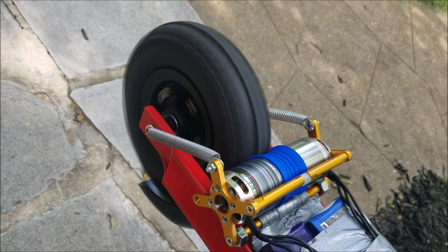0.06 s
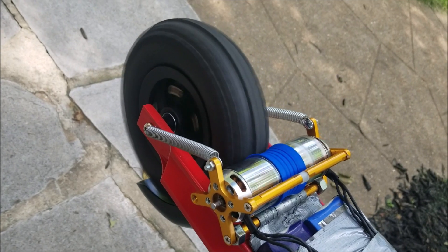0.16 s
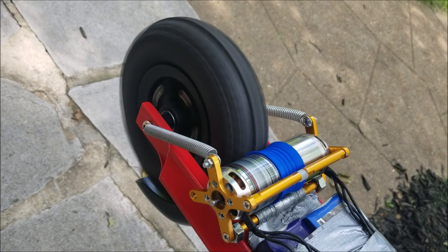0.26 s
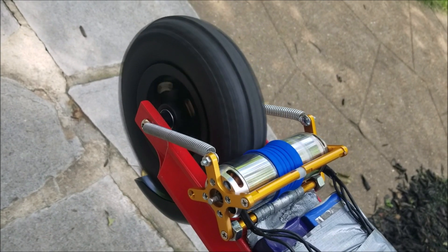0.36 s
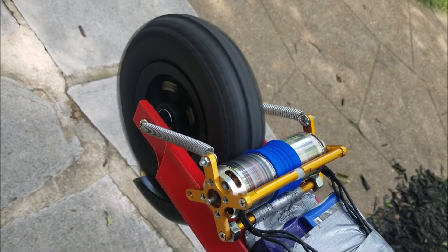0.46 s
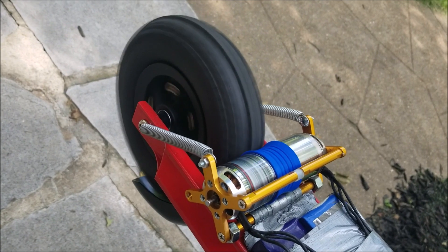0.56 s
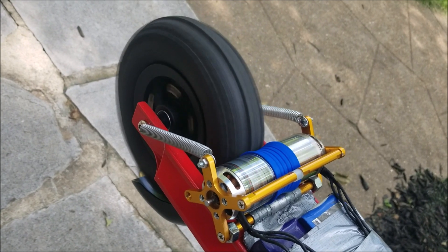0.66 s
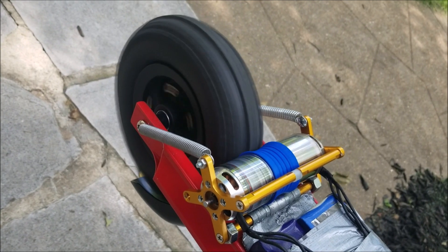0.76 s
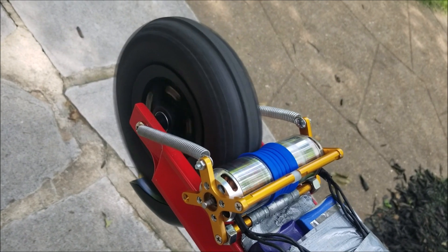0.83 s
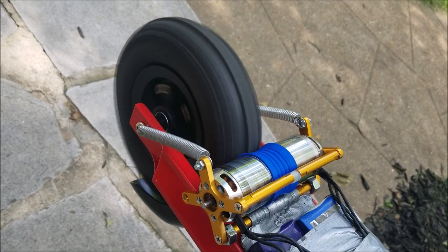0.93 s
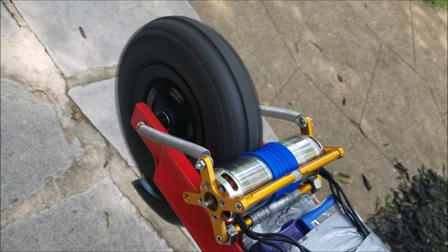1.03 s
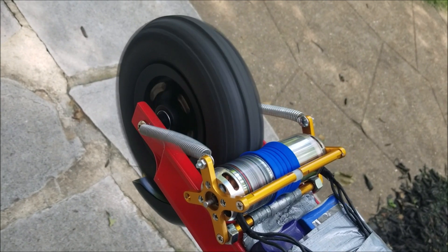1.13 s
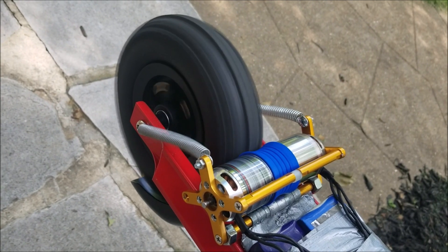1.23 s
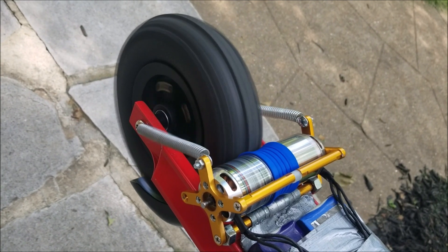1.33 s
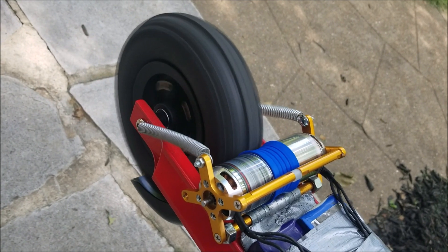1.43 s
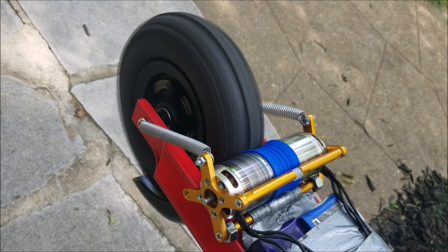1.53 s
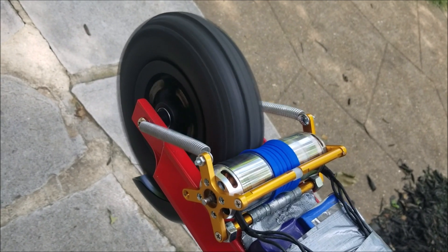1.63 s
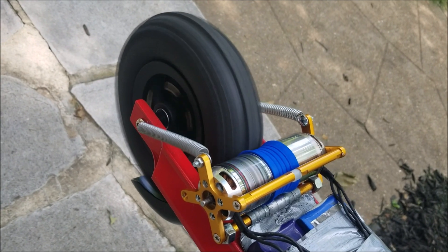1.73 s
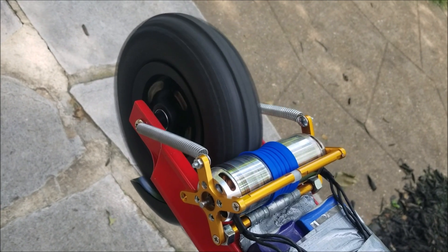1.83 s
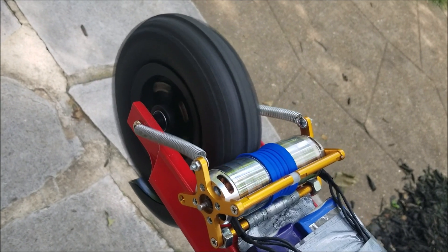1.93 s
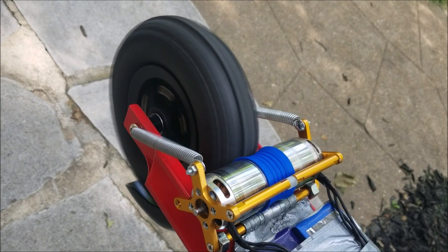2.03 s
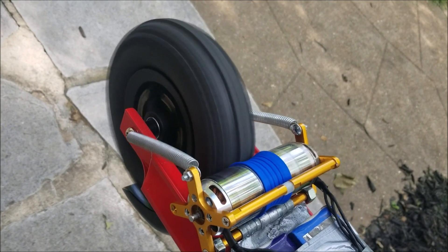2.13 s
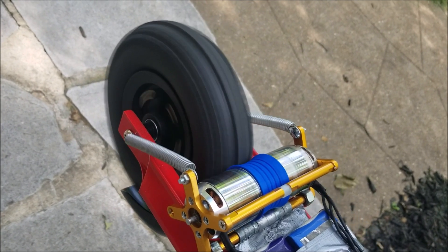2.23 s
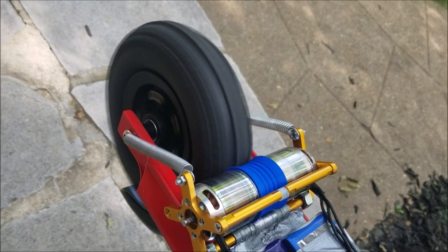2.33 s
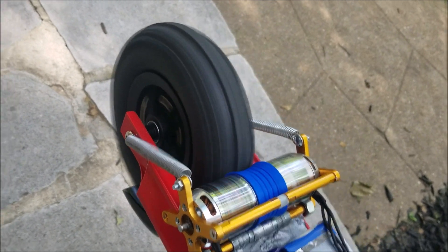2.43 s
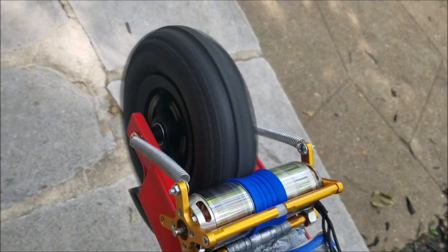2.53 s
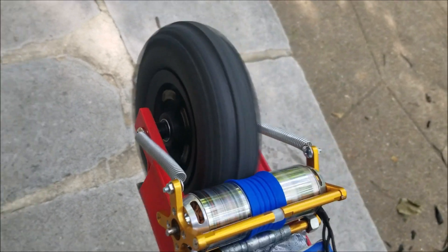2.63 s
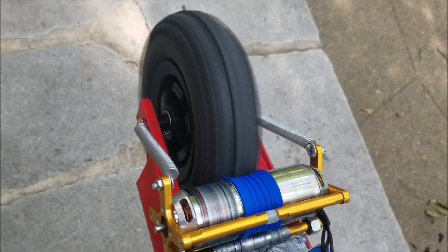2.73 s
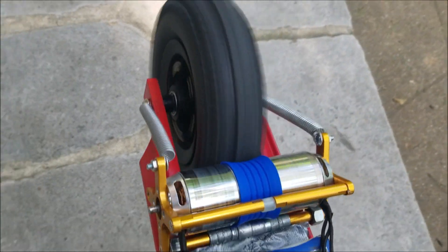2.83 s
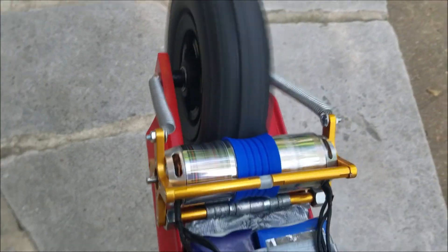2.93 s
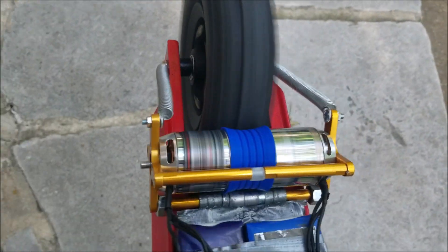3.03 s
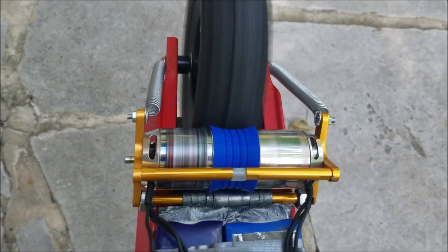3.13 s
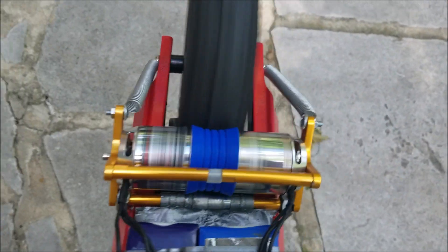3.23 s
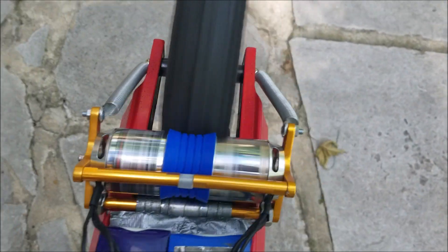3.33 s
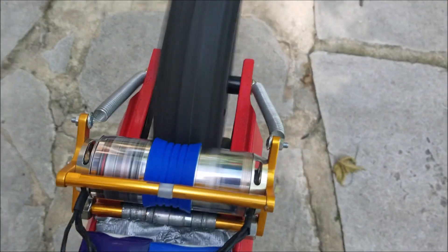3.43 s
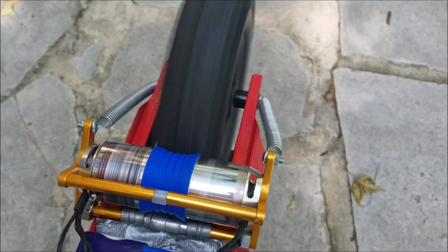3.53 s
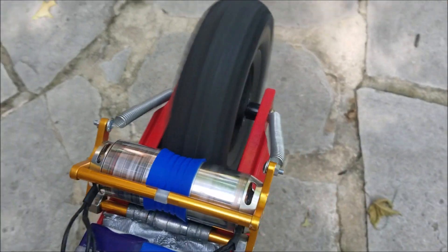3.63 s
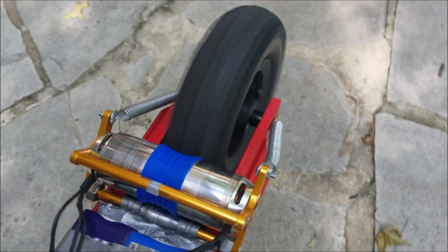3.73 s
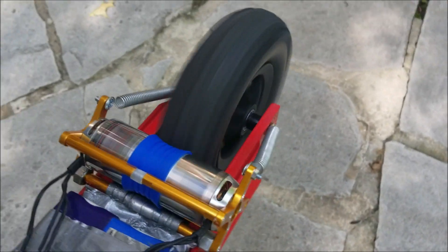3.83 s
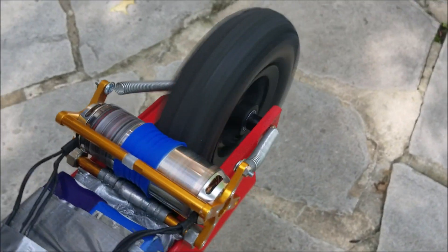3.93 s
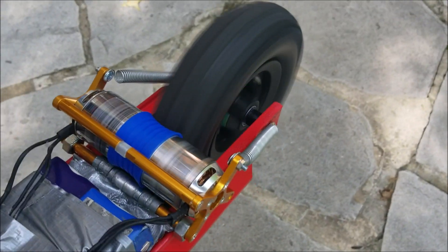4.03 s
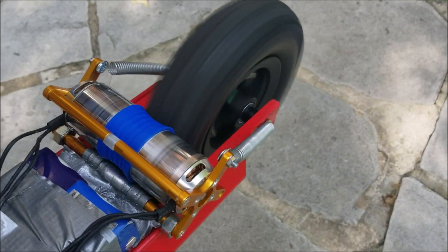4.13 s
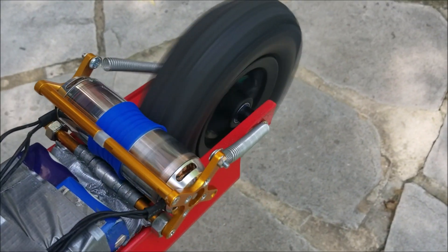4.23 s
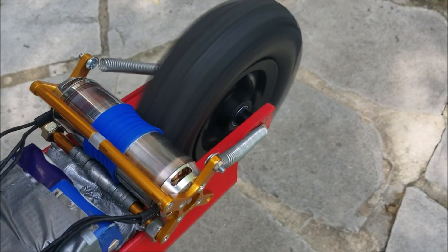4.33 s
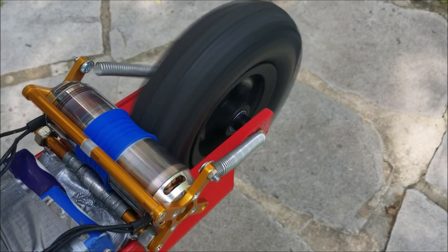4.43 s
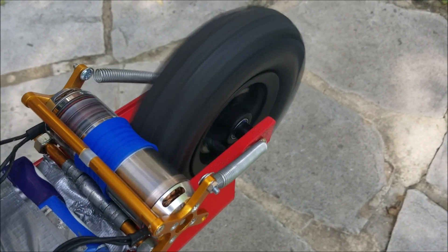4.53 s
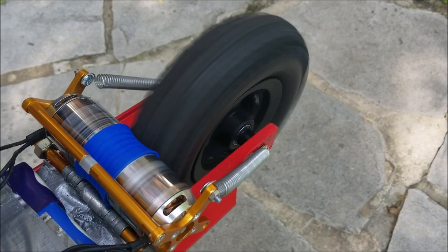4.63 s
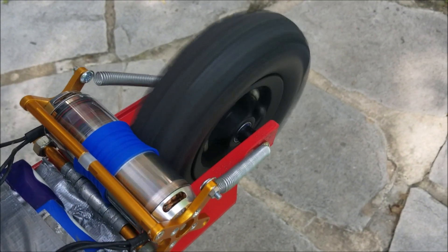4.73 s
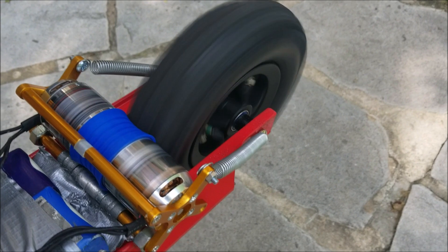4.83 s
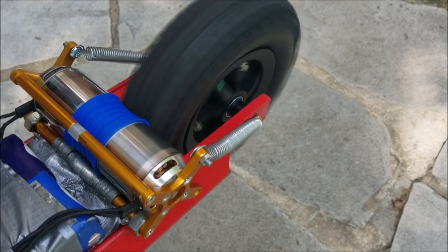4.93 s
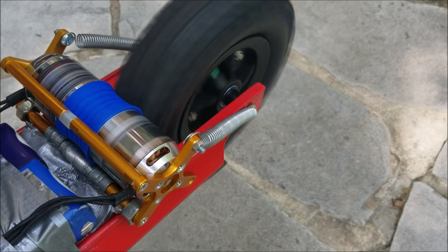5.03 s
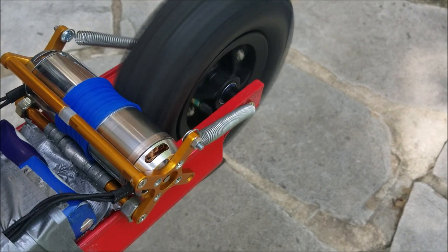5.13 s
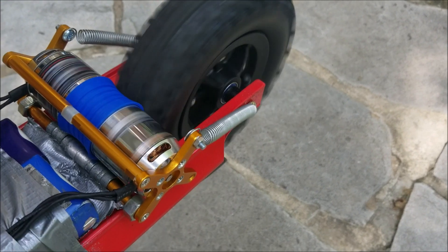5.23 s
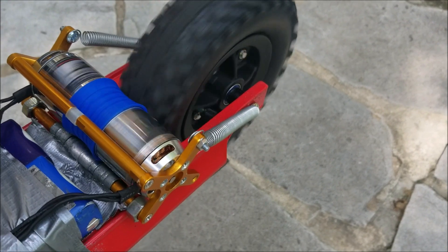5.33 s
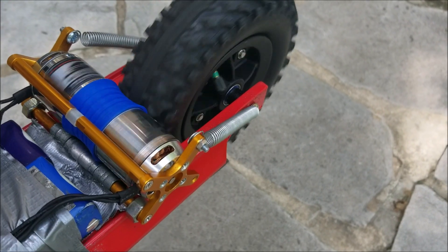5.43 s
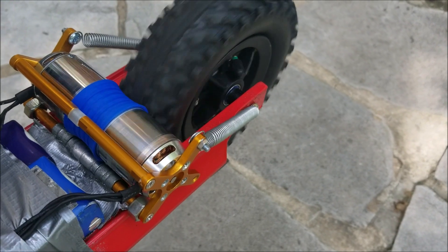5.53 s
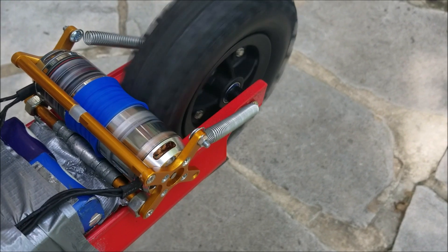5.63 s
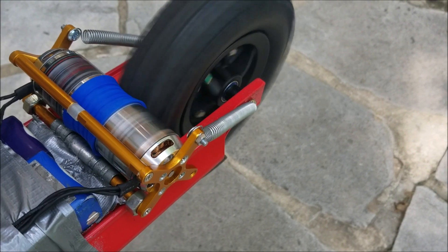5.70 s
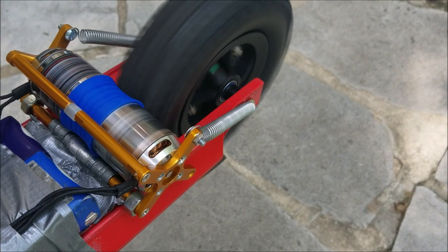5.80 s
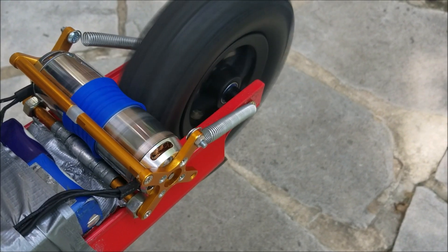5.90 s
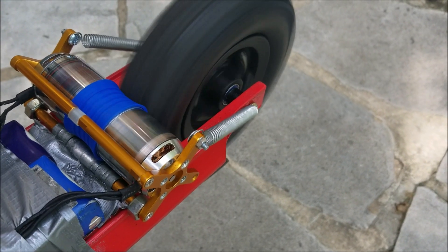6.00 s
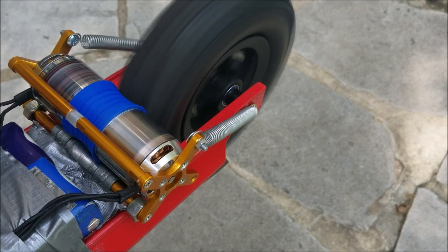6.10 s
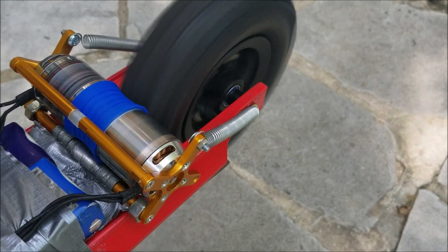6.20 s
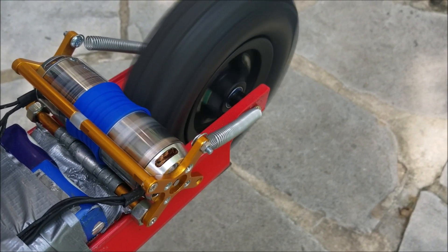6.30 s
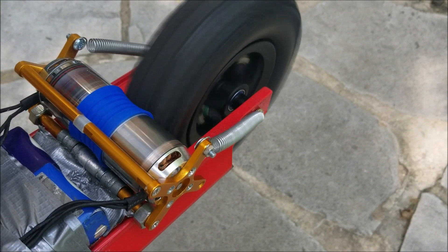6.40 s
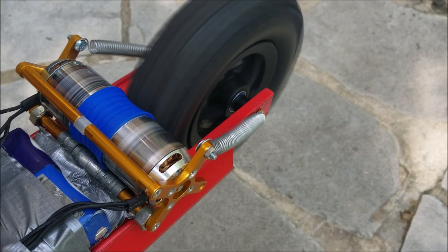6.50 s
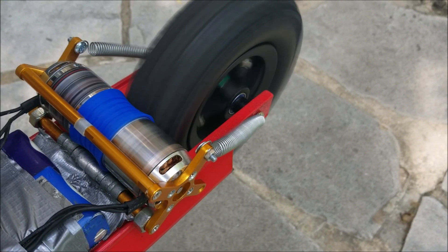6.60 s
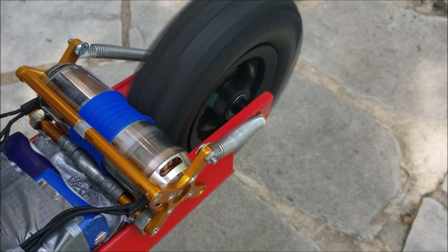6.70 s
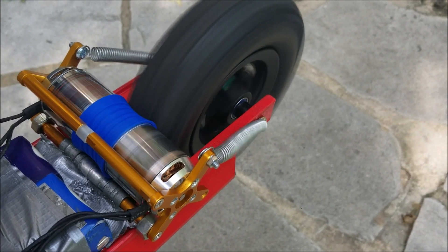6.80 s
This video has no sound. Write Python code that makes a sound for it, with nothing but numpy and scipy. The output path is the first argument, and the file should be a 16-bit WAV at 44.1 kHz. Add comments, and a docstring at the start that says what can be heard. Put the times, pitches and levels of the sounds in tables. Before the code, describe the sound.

An electric motor spins a lifted scooter tire through a friction roller, heard close up outdoors. A layered whine and tread drone rise in pitch over grinding, hissing rubber, then hold at full speed while the microphone moves around the wheel. The wheel coasts almost to rest, the drive cuts in with a faint tick and spins it quickly back up, easing off once briefly. A thin, high whistle sounds at part throttle.

```python
"""A lifted scooter tyre, spun by an electric motor's friction roller, heard close up on a stone patio.
It speeds up, runs flat out, coasts almost to rest and is driven up again, with one short let-up.
Tread, ribs and motor whine through the frame's resonances, the rubber grinds and hisses, and the
controller whistles at part throttle. A two-port stereo microphone is walked round the wheel from
side A to side B, over a faint distant rumble."""
import sys
import numpy as np
from scipy import signal
from scipy.fft import rfft, irfft, next_fast_len
from scipy.io import wavfile
from scipy.ndimage import uniform_filter1d, map_coordinates

SR = 44100
rng = np.random.default_rng(int(sys.argv[2]) if len(sys.argv) > 2 else 0)


def dump(signal):
    """Clip the signal to [-1, 1] and save it as 16-bit WAV at the path in sys.argv[1]."""
    limited = np.clip(np.atleast_2d(signal).T, -1, 1)
    pcm = np.round(limited * 32767).astype(np.int16)
    wavfile.write(sys.argv[1], SR, pcm)


N = 302511

TREAD, RIBS, ROLLER, FIELD = 28, 26, 4.533, 32.85  # cycles per wheel turn; FIELD is the motor's
CAN_ORDER = 126.8  # the motor can's whine, cycles per wheel turn
COGS = 24  # magnetic detents per roller turn

# slow climb, flat out, coast, full throttle, short let-up: (time [s], wheel speed [turns/s])
WHEEL_SPEED = [(0, 15.75), (.2, 16.42), (.73, 17.38), (.84, 18.03), (1.17, 19.38), (1.71, 20.77),
               (1.93, 21.83), (4.5, 21.83), (4.565, 21.6), (4.66, 18.55), (4.82, 15.65), (5.3, 4.4),
               (5.43, 1.9), (5.56, 1.3), (5.63, 2.2), (5.7, 5.2), (5.89, 13.4), (6.03, 19.8), (6.08, 21.3),
               (6.15, 21.83), (6.31, 21.83), (6.42, 18.65), (6.51, 16.6), (6.645, 15.4), (6.77, 21.3),
               (6.86, 21.83)]
# the microphone's path round the wheel: (time [s], place [0 side A, 1 side B])
MIC_WALK = [(0, 0), (2.3, 0.012), (2.7, 0.22), (3.1, 0.79), (3.8, 0.95), (6.86, 0.98)]
# left port against right: (frequency [Hz], lead at A [rad], level at A [dB], lead at B [rad],
# level at B [dB])
MIC_PORTS = [(100, 0, 1, 0, 1.5), (600, .4, 7, .8, 4), (850, 0, 0, 1, 4), (1250, -.1, 1.5, 1.8, 1),
             (1650, -1.4, 3, 2.6, 2), (2000, -1.6, 0, 3.8, -6), (2300, -1.4, 0, 4.2, 0),
             (2800, -.4, 1, 5.9, -1), (3400, 0, -2, 7.6, 5), (4800, .4, -4, 10.5, 0),
             (7000, .6, 2, 15.5, 6), (8300, .3, -1, 18.5, 0), (12000, 0, 0, 28.4, 0)]
# how alike noise is at the two ports: (frequency [Hz], coherence [0-1])
MIC_COHERENCE = [(100, 0.83), (600, 0.71), (1000, 0.16), (1400, 0.99), (2200, 0.11), (2900, 0.32),
                 (4000, 0.25), (7000, 0.15), (9000, 0.028)]
# colour at the microphone on side A: (frequency [Hz], gain [dB])
SIDE_A_COLOUR = [(900, -2), (1300, -0.5), (2100, -1.5), (4300, 0.5), (7000, -1.5), (10000, -2.5),
                 (14000, -2.5)]
# still outdoor air: (frequency [Hz], level [dB])
OUTDOOR_AIR = [(15, -46), (25, -20), (65, 0), (152, -9), (216, -8.5), (264, -11), (356, -18), (815, -10),
               (1250, -15), (2110, -42), (6530, -44), (8390, -68), (10000, -58), (13000, -91.5),
               (22000, -120)]
# response of frame, wheel and motor can: (frequency [Hz], gain [dB])
BODY_RESPONSE = [(120, -30), (215, -27.5), (265, -39), (325, -30), (400, -27), (500, -21.5), (650, -18),
                 (850, -12.5), (1050, -11), (1300, -12), (1700, 0), (2000, -1), (2250, 1), (2550, -4.5),
                 (2850, -9), (3400, -12.5)]
# the frame's own notes, brought out by slow rubbing: (frequency [Hz], level [dB])
FRAME_NOTES = [(600, -29), (900, -7.5), (1300, -14.5), (1750, 0.5), (2050, 2), (2350, -10), (2800, -13.5),
               (3200, -61)]
# sharp resonances of the mount: (frequency [Hz], width [Hz], boost [dB])
MOUNT_MODES = [(719, 16, 7.5), (1080, 26, 7.5), (1816, 31, 3)]
# the tyre's answer to its tread, peaking at air cavity and casing: (frequency [Hz], level [dB])
TYRE_RESPONSE = [(100, -64), (200, -54.5), (268, -44), (330, -55.5), (440, -44), (520, -36.5), (560, -32),
                 (595, -26.5), (620, -29)]
# controller whistle; rows: lower, upper sideband
# (light-load level at A [dB], light-load level at B [dB], level of the ripple-driven part [dB])
SIDEBANDS = [(-52, -51, -31), (-51, -59, -37)]
# roller on rubber; rows: grind, hiss, fizz
# (level at A [dB], level at B [dB], growth [dB per tenfold speed], knee speed [turns/s])
RUB_LEVELS = [(-29.5, -27, 39, 9.3), (-33, -29.5, 45, 24), (-35.5, -37.5, 38, 21.6)]
# the rubbing's low, high and top bands: (frequency [Hz], level [dB])
GRIND_SPECTRUM = [(150, -51), (400, -1.5), (650, 3.5), (1000, -4), (3000, -8), (4200, -7.5), (7000, -25.5)]
HISS_SPECTRUM = [(1800, -21.5), (3200, 0.5), (3700, -4), (4500, 1.5), (5700, -2), (6800, -1), (7800, -12),
                 (9000, -22.5), (11000, -7.5), (16000, -33)]
FIZZ_SPECTRUM = [(6000, -11), (9000, -3), (10300, -7), (11300, 5.5), (12500, 4.5), (14200, 1), (15700, 3.5)]
# the microphone crosses treble beamed from the gap between roller and tyre: (time [s], level [dB])
TREBLE_BEAM = [(2.25, 1), (2.7, 2), (3.1, 0.5), (3.7, -0.5)]
# weaker whines: (order [cycles per wheel turn], relative level at A [dB], relative level at B [dB])
WEAK_ORDERS = [(9.03, -2, -4.5), (18.2, -2.5, -6), (26.06, -1, -10), (31.04, -1, -5), (32.64, -10, -2.5),
               (36.17, -11, -10), (41.3, -11, -19), (45.44, -12, -10.5), (59.4, -10, -12), (63.5, -7, -12),
               (65.8, -9, -15.5), (72.34, -8.5, -10), (73.6, -16, -20), (82.1, -34, -26), (82.6, -14, -26),
               (90.2, -12, -14), (94, -14, -10.5), (98.5, -4.5, -23), (163.3, -14, -20), (182.8, -8.5, -7),
               (236.6, -10, -16)]
# strong whines; rows: second rib, second tread, third rib, fourth rib, squeal, can, cogging
# (level at A [dB], level at B [dB], resonance at A [Hz], resonance at B [Hz], width [Hz], boost [dB])
STRONG_WHINES = [(-42.5, -45, 1063, 1096, 72, 15), (-36, -33.5, 1046, 1060, 62, 12),
                 (-40, -31.5, 1705, 1705, 77, 7.5), (-38.5, -33, 1978, 1960, 129, 20),
                 (-36.5, -33, 2188, 1990, 178, 15.5), (-42, -37, 2650, 2690, 42, 15),
                 (-45, -45, 2200, 2160, 96, 13)]
# the third and fourth rib overtones and the motor squeal flare and fade: (time [s], level [dB])
THIRD_RIB_SWELL = [(1.7, 2.5), (2.3, -3.5), (2.9, -7), (3.1, -7), (3.24, -5.5), (3.31, 6), (3.42, -5.5),
                   (3.53, 0), (3.7, 1), (3.85, -6), (4.04, 1.5), (4.15, -5), (4.45, -1.5), (4.6, -5),
                   (6.2, 0)]
FOURTH_RIB_SWELL = [(0.65, -2), (0.8, 1), (1.0, -5), (1.14, -2.5), (1.3, -3), (1.66, 6), (2, -5),
                    (2.45, 2.5), (2.7, 6), (2.95, -1.5), (3.15, -6), (3.5, -13), (3.7, 1), (3.85, -10),
                    (4.2, 3.5), (4.55, 2.5), (4.61, -5), (4.66, -4), (4.75, -2.5), (6.0, 0.5), (6.25, 1.5),
                    (6.42, -12), (6.58, 10.5), (6.72, -9), (6.86, 0)]
SQUEAL_SWELL = [(0, -3), (0.15, -5.5), (0.45, -0.5), (0.56, -4), (0.66, -9), (0.77, -6), (0.84, 5),
                (0.95, -1.5), (1.3, -3.5), (4.5, -2.5), (4.74, -9), (4.84, -2), (4.9, 7), (4.96, -0.5),
                (5.12, 2), (5.8, -1), (5.89, 0.5), (5.94, -4.5), (6.1, -2), (6.54, -5.5), (6.6, -1),
                (6.7, -5)]


def amp(db):
    """Decibels to gain."""
    return 10 ** (np.asarray(db) / 20)


def unit(x):
    """x at rms 1."""
    return x / np.sqrt(np.mean(x ** 2) + 1e-20)


def along(points, hz):
    """Each column of a table over frequency, read on a log axis."""
    freqs, *cols = np.transpose(points)
    return np.squeeze([np.interp(np.log(hz + 1), np.log(freqs + 1), col) for col in cols])


def curve(points):
    """A table over time as one value per sample."""
    return np.interp(np.arange(N) / SR, *np.transpose(points))


def sided(at_a, at_b):
    """A value that follows the microphone from side A to side B."""
    return at_a + curve(MIC_WALK) * (at_b - at_a)


def noise():
    """Two unrelated white noises."""
    return rng.standard_normal((2, N))


def wobble(rate):
    """A smooth random curve, rate knots a second."""
    coarse = np.arange(0, N + 64, 64)
    knots = rng.standard_normal(int(N * rate / SR) + 4)
    return np.interp(np.arange(N), coarse, map_coordinates(knots, [coarse * rate / SR]))


def filtered(x, response):
    """x times a response of frequency."""
    size = next_fast_len(N + SR // 4)
    return irfft(rfft(x, size) * response(np.fft.rfftfreq(size, 1 / SR)), size)[..., :N]


def skirt(width_hz):
    """Slow noise of rms 1; a tone multiplied by it spreads by this width."""
    return unit(filtered(rng.standard_normal(N), lambda hz: 1 / (1 + (hz / width_hz) ** 2)))


def peak(hz, centre_hz, width_hz, boost_db):
    """Gain in dB of one resonance."""
    return boost_db / (1 + ((hz - centre_hz) / width_hz) ** 2)


def ringing(x, centre_hz, width_hz):
    """One resonance driven by x, at rms 1."""
    return unit(filtered(x, lambda hz: (1 + 1j * (hz - centre_hz) / width_hz) ** -2))


def spread(pair):
    """Two unrelated signals become left and right, partly alike."""
    angle = lambda hz: np.arccos(np.clip(along(MIC_COHERENCE, hz), 0, 1)) / 2
    mid, side = filtered(pair, lambda hz: np.array([np.cos(angle(hz)), np.sin(angle(hz))]))
    return np.array([mid + side, mid - side])


def stereo_band(pair, *spectra):
    """A pair spread over the two ports and shaped by spectra, at rms 1."""
    return unit(filtered(spread(pair), lambda hz: amp(sum(along(s, hz) for s in spectra))))


def surface(turns, count):
    """A random profile with count harmonics round a circumference, met again at every turn."""
    harmonics = rng.standard_normal(count) + 1j * rng.standard_normal(count)
    profile = irfft(np.r_[0, harmonics], 20 * count)
    return unit(np.interp(turns % 1, np.linspace(0, 1, len(profile)), profile))


def tone(cycles, slip, flutter_db):
    """A tone of rms about 1 whose phase wanders by slip radians and whose level flutters."""
    phase = 2 * np.pi * (cycles + rng.random()) + slip * wobble(24)
    return np.sqrt(2) * np.sin(phase) * amp(flutter_db * wobble(35))


def contact_db(speed, a_db, b_db, slope_db, knee_speed):
    """Level of a contact sound: a power of the speed, up to a ceiling."""
    return sided(a_db, b_db) + slope_db * np.log10(np.minimum(speed / knee_speed, 1))


def swept_db(speed, order, a_db, b_db, a_hz, b_hz, width_hz, boost_db):
    """Level of a whine that sweeps across the body's response and one sharp resonance."""
    hz = order * speed
    level_db = contact_db(speed, a_db, b_db, slope_db=28, knee_speed=13)
    return level_db + along(BODY_RESPONSE, hz) + peak(hz, sided(a_hz, b_hz), width_hz, boost_db)


def current(speed, smoothing_s=0.59):
    """Motor current, 0-1: it follows the acceleration."""
    push = uniform_filter1d(np.maximum(np.gradient(speed), 0), int(smoothing_s * SR))
    return push / push.max()


def ripple(speed):
    """Current ripple, 0-1: for a given current it is greatest at a third of top speed."""
    duty = speed / speed.max()
    chop = duty * (1 - duty) ** 2
    return current(speed) * (chop / chop.max()) ** 1.23


def paving(x, echo_db, t60_s=0.038):
    """Patio slabs and frame scatter a short echo, different at each port."""
    t = np.arange(SR // 12) / SR
    tails = rng.standard_normal((2, len(t))) * amp(-60 * t / t60_s)
    tails /= np.linalg.norm(tails, axis=1, keepdims=True)
    echo = signal.fftconvolve(x[None], tails, axes=1)[:, :N]
    return (x + amp(echo_db) * echo) / np.hypot(1, amp(echo_db))


def walking_microphone(x):
    """Delay and shading between the two ports change on the way round the wheel."""
    hz, t, spectrum = signal.stft(x, SR, nperseg=1024)
    place = np.interp(t, *np.transpose(MIC_WALK))
    lead_a, tilt_a, lead_b, tilt_b = along(MIC_PORTS, hz)[..., None]
    lead = lead_a + place * (lead_b - lead_a)
    tilt_db = tilt_a + place * (tilt_b - tilt_a)
    left = amp(tilt_db / 2) * np.exp(.5j * lead)
    gains = np.array([left, 1 / left])
    gains /= np.sqrt(np.mean(abs(gains) ** 2, axis=0))
    gains *= amp((1 - place) * along(SIDE_A_COLOUR, hz)[:, None])
    return signal.istft(spectrum * gains, SR, nperseg=1024)[1][:, :N]


def rumble_and_hum(hum_hz=267):
    """A low rumble in the distance; close by, a faint hum near 267 Hz, a note of the frame and tyre, comes in
    towards side B."""
    rumble = amp(-55.5) * stereo_band(noise(), OUTDOOR_AIR)
    hum = tone(hum_hz * np.arange(N) / SR, slip=.7, flutter_db=2)
    return rumble + amp(-65) * curve(MIC_WALK) * hum


def can_ring(speed):
    """At speed the rubbing keeps the motor can ringing, picked up from side B."""
    ring = ringing(spread(noise()), centre_hz=2740, width_hz=170)
    return amp(-43) * curve(MIC_WALK) * (speed / speed.max()) ** 2 * ring


def restart(speed, turns, start_s=5.54, rise_s=0.068):
    """The drive cuts in with a tick; its torque pulses ring the motor can as the wheel gathers speed."""
    age = np.maximum(np.arange(N) / SR - start_s, 0)
    rasp = stereo_band(noise(), HISS_SPECTRUM) * (age > 0)
    tick = rasp * (amp(-58 - 60 * age / 0.05) + amp(-59 - 60 * age / 1.5))  # snap and tail
    kicks = rng.standard_normal(N) * amp(2.3 * surface(ROLLER * turns, count=7))
    ring = ringing(kicks, centre_hz=2765, width_hz=70)
    return tick + amp(-39) * (1 - np.exp(-age / rise_s)) * ripple(speed) * ring


def controller(speed, turns, carrier_hz=11920):
    """Switching sidebands whistle: they move apart with speed, grow with current and stop flat out."""
    slow_dip = 0.99 + 0.01 * np.minimum(speed / 4.8, 1)
    chopping = slow_dip * (1 - (speed / speed.max()) ** 11) ** 2
    load = ripple(speed)
    lower_gain, upper_gain = [amp(sided(a_db, b_db)) * chopping + amp(load_db) * load
                              for a_db, b_db, load_db in SIDEBANDS]
    carrier, field = carrier_hz * np.arange(N) / SR, FIELD * turns
    # unequal magnets blur each sideband
    uneven = lambda depth: 1 + depth * surface(ROLLER * turns, count=4)
    lower = tone(carrier - 2 * field, slip=.15, flutter_db=.6) * uneven(.3)
    upper = tone(carrier + 2 * field, slip=.15, flutter_db=.6) * uneven(.2)
    # heavy current raises an outer sideband and a sizzle that clings to the lower one
    outer = amp(-53) * load * tone(carrier + 4 * field, slip=.82, flutter_db=1) * uneven(.54)
    sizzle = (amp(-9) + amp(-14) * load) * lower * skirt(width_hz=259)
    # a resonance lifts the lower sideband at light load and dips it at heavy load
    winding_db = (0.5 - load) * peak(carrier_hz - 2 * FIELD * speed, 10890, 43, 7)
    whistle = lower_gain * (lower * amp(winding_db) + sizzle) + upper_gain * upper + outer
    return paving(whistle, echo_db=-9)


def weak_whines(speed, turns):
    """Lesser orders of wheel and motor swell as they cross the resonances of body and mount."""
    whines = np.zeros(N)
    hz = np.geomspace(20, SR / 2, 1500)
    response_db = along(BODY_RESPONSE, hz) + sum(peak(hz, *mode) for mode in MOUNT_MODES)
    for order, a_db, b_db in WEAK_ORDERS:
        level_db = sided(a_db, b_db) + np.interp(order * speed, hz, response_db)
        whines += amp(level_db) * tone(order * turns, slip=.35, flutter_db=2.5)
    gain = amp(contact_db(speed, *RUB_LEVELS[0])) * speed / speed.max()
    return paving(gain * whines, echo_db=-5)


def rubbing(speed, turns, slip_db=2.5):
    """Tyre and roller roughness repeat with their turns; loose slip hisses, pulsing with the roller."""
    pace = speed / speed.max()
    roller_turns = ROLLER * turns
    pressure = surface(roller_turns, count=6)
    impact = pace ** 2  # bumps strike harder at speed
    tyre = impact * np.array([surface(turns, count=700) * (1 + .21 * pressure) for _ in range(2)])
    bearing = impact * np.array([surface(roller_turns, count=155) for _ in range(2)])
    roughness = 1.05 * tyre + .45 * bearing + .95 * noise() * amp(1.5 * pressure)
    rush = stereo_band(roughness, BODY_RESPONSE, GRIND_SPECTRUM)
    # at low speed the rubber drags and rings the frame instead of rushing
    drag = np.clip(1.3 * (1 - pace), 0, .7)
    frame = stereo_band(noise() * amp(.47 * pressure), FRAME_NOTES)
    grind = np.sqrt(1 - drag) * rush + np.sqrt(drag) * frame
    # a high spot on the roller scuffs the tyre once a turn, harder or softer by chance
    scuff = np.exp(10 * (np.cos(2 * np.pi * roller_turns) - 1)) * amp(3.2 * wobble(110))
    sliding = noise() * (amp(.5 * pressure) + .91 * scuff)
    hiss = stereo_band(.074 * tyre + .05 * bearing + sliding, HISS_SPECTRUM)
    fizz = stereo_band(noise() * (amp(2.1 * wobble(300)) + .4 * scuff), FIZZ_SPECTRUM)
    grind_db, hiss_db, fizz_db = [contact_db(speed, *row) for row in RUB_LEVELS]
    treble_db = curve(TREBLE_BEAM) + slip_db * current(speed)
    grind_db += 4 * np.log10(pace) + .53 * wobble(25)  # still creeps up above its knee
    hiss_db += treble_db + .38 * wobble(8)
    fizz_db += treble_db + .48 * wobble(11)
    return amp(grind_db) * grind + amp(hiss_db) * hiss + amp(fizz_db) * fizz


def tread_drone(speed, turns):
    """Tread blocks drum on the roller, and the tyre's sidewalls radiate the note."""
    runout = 1 + .21 * np.cos(2 * np.pi * ROLLER * turns)  # the roller presses harder once a turn
    # with the microphone edge-on to the wheel, the sidewalls arrive weak and out of step
    edge_on_db = curve([(2.6, -2.5), (3, -14.5), (3.45, -6), (4.2, -4.5), (6.1, -3.5)])
    skew_cycles = curve([(2.5, 0.064), (2.95, 0.11), (3.3, 0)]) * np.array([[1], [-1]])
    level_db = along(TYRE_RESPONSE, TREAD * speed) + edge_on_db
    return amp(level_db) * runout * tone(TREAD * turns + skew_cycles, slip=.03, flutter_db=.44)


def strong_whines(speed, turns, chatter_rad=.25):
    """Tread, rib and motor overtones sweep through resonances; the squeal beats with the fifth rib's."""
    # the roller chatters on the rubber below top speed and runs smoothly flat out
    unsettled = np.minimum(12 * (1 - speed / speed.max()), 1)
    chatter = chatter_rad / (2 * np.pi) * unsettled * skirt(width_hz=90)
    # uneven rubber wraps an overtone in a cluster of close tones
    uneven = lambda depth: 1 + depth * surface(turns, count=8)

    def whine(order, row, slip, flutter_db):
        return amp(swept_db(speed, order, *row)) * tone(order * turns + chatter, slip, flutter_db)

    rib_row, tread_row, third_row, fourth_row, squeal_row, can_row, cogging_row = STRONG_WHINES
    second = (whine(2 * TREAD, tread_row, .27, 1.5) + whine(2 * RIBS, rib_row, .35, 1)) * uneven(.3)
    third = whine(3 * RIBS, third_row, .15, .8) * uneven(.28)
    fourth = whine(4 * RIBS, fourth_row, .1, .6) * uneven(.2)
    squeal = whine(4 * FIELD, squeal_row, .22, 1) * uneven(.25)
    fifth = whine(5 * RIBS, squeal_row, .3, .8)
    can = whine(CAN_ORDER, can_row, .2, 1.5)
    cogging = whine(COGS * ROLLER, cogging_row, .35, 1.5) * uneven(.4)
    torque_db = 7.5 * current(speed)
    whines = second + cogging + amp(torque_db) * can
    whines += amp(curve(THIRD_RIB_SWELL)) * third
    whines += amp(curve(FOURTH_RIB_SWELL) - torque_db) * fourth
    whines += amp(curve(SQUEAL_SWELL)) * (squeal + amp(sided(-8, 1)) * fifth)
    return paving(whines, echo_db=-12)


def scene(inertia_s=.03):
    """The scooter close to the microphone, all geared to its wheel, with the open air behind."""
    speed = uniform_filter1d(curve(WHEEL_SPEED), int(inertia_s * SR))
    turns = np.cumsum(speed) / SR
    whines = tread_drone(speed, turns) + strong_whines(speed, turns) + weak_whines(speed, turns)
    rubber = rubbing(speed, turns)
    drive = can_ring(speed) + controller(speed, turns) + restart(speed, turns)
    return walking_microphone(whines + rubber + drive) + rumble_and_hum()


def record(dry, top_hz=15800):
    """The recorder keeps nothing above its band limit."""
    return filtered(dry, lambda hz: hz < top_hz)


dry = scene()
out = record(dry)
dump(out)
```